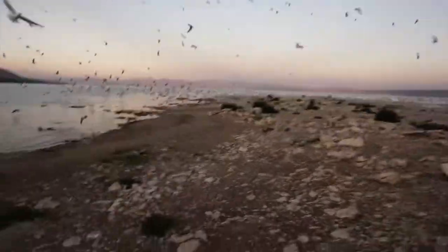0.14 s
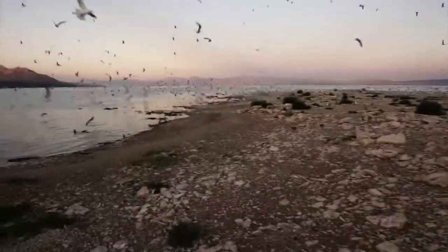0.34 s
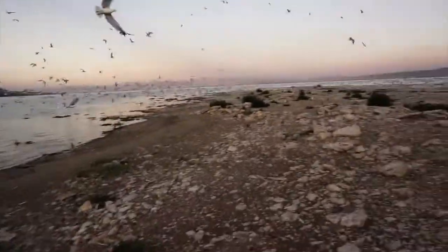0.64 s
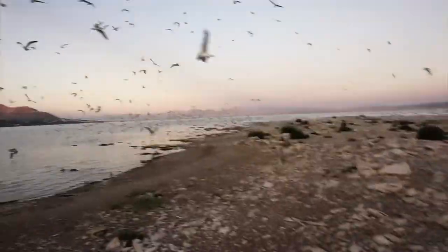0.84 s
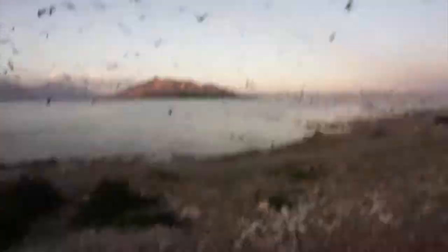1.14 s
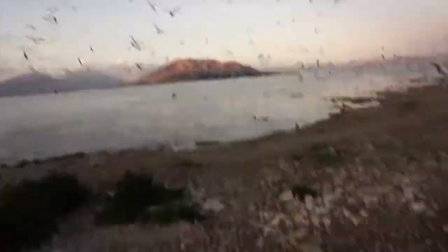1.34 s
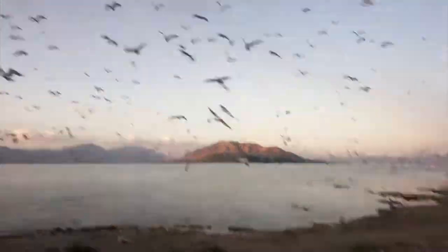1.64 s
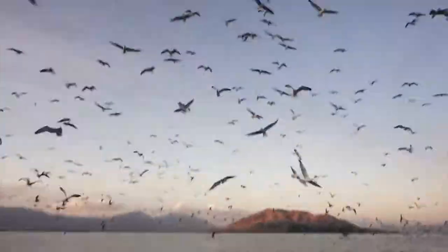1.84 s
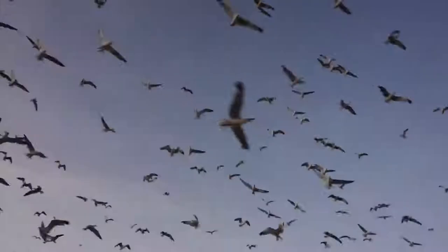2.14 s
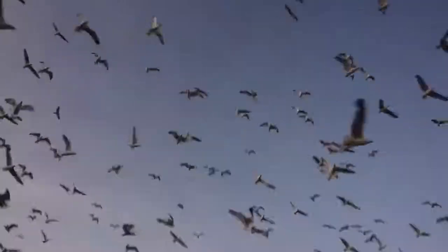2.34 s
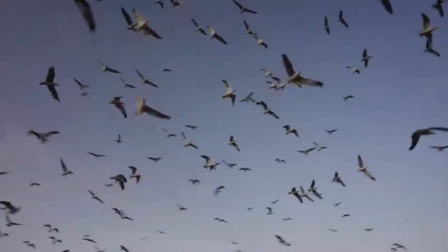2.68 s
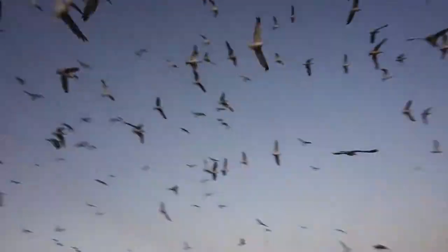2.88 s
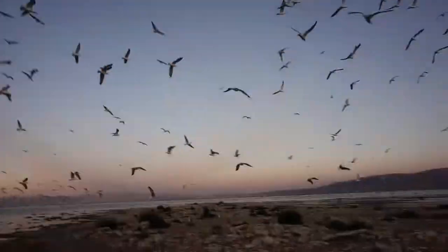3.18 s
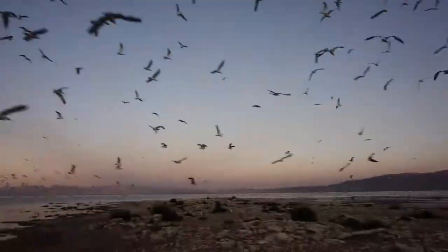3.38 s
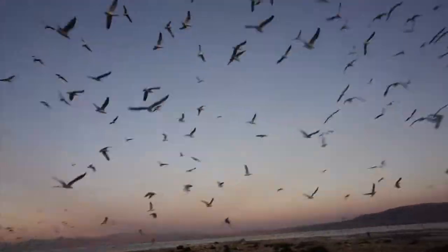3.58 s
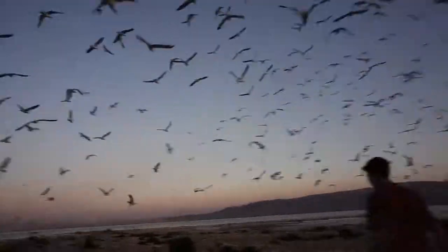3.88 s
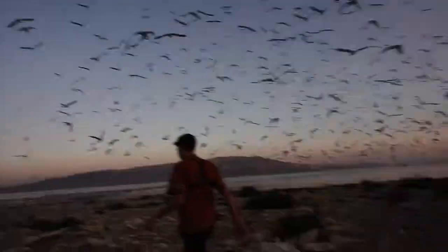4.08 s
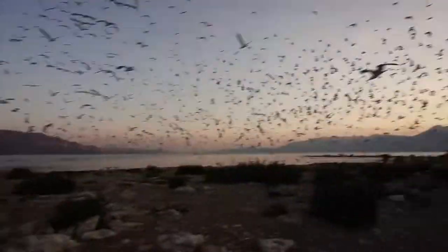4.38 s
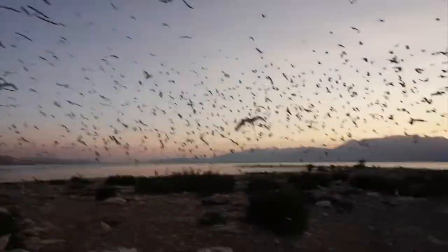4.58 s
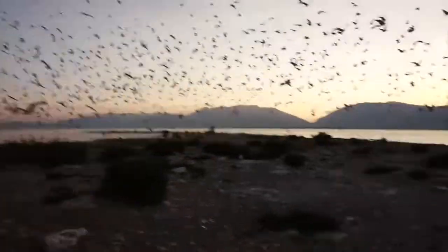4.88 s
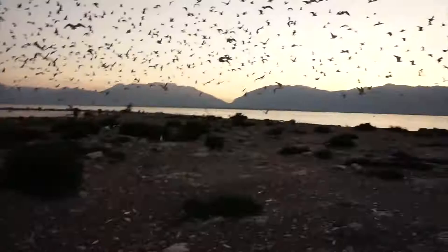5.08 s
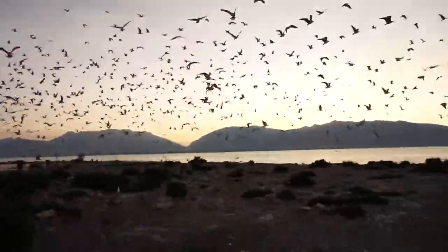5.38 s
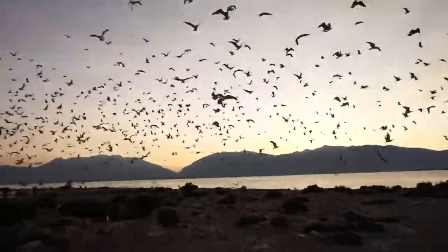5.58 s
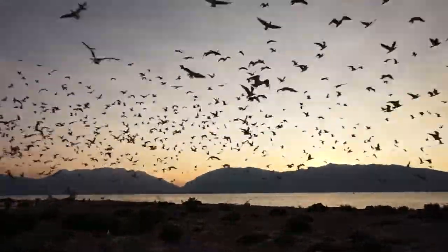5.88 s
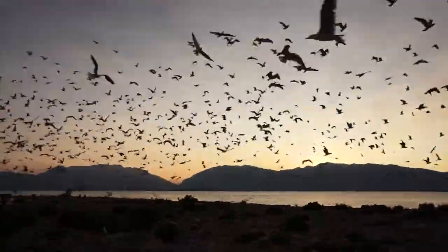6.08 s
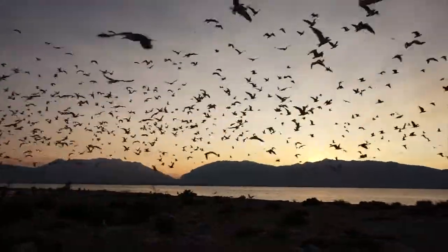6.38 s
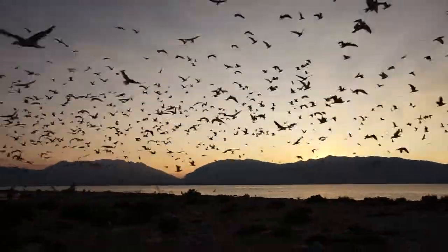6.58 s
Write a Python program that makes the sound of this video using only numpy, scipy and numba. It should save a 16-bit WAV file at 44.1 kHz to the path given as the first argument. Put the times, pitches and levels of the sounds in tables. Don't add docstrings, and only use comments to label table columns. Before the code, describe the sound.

Outdoors by water, a swirling gull colony screams without pause, starting moderately quiet and farther off, closing in to a thick wall of piercing cries. Single arched calls, high whistles and hoarse rasps stand out nearby, leaning slightly left. Wind puffs begin just before two seconds and grow into heavy, fluttering buffets around four to five, then weaken. Handheld stereo microphone, dry open air, limited top treble.

```python
import sys
import numpy as np
from scipy import signal
from scipy.io import wavfile
from scipy.ndimage import uniform_filter1d
from numba import njit

SR = 44100
rng = np.random.default_rng(int(sys.argv[2]) if len(sys.argv) > 2 else 0)


def amplitude_ratio(level_db):
    exponent = np.asarray(level_db, float) / 20
    return 10 ** exponent


def inscribe(sig):
    pcm = np.round(np.clip(np.atleast_2d(sig).T, -1, 1) * 32767)
    wavfile.write(sys.argv[1], SR, pcm.astype(np.int16))


N = 296793

# time in seconds, level in dB.
BREEZE = [
    (0, -80),
    (.43, -86),
    (1.3, -76),
    (2.3, -63),
    (2.8, -57),
    (3.6, -63),
    (5.3, -48),
    (6.73, -66),
]
# peak in seconds, level in dB, seconds to rise 20 dB, seconds to fall 20 dB.
GUSTS = [(.65, -71, .3, 1.5), (1.65, -57, .4, .22), (1.8, -43, .055, .4), (2.15, -48, .09, .11),
         (2.88, -39, .11, .19), (3.75, -43, .085, .18), (3.86, -36, .055, .09), (4.01, -32, .06, .21),
         (4.35, -33, .5, .11), (4.57, -26, .042, .07), (4.74, -25, .19, .42), (5.73, -39, .8, .24),
         (6.02, -36.5, .7, .27), (6.37, -36, .035, .13), (6.69, -47, .14, .06)]
# centre in seconds, level in dB, half-length in seconds.
EDDIES = [(1.82, -46, 0.024), (2.844, -25, 0.017), (2.906, -27.5, 0.023), (2.95, -33, 0.031),
          (3.751, -40, .012), (3.868, -27.5, 0.014), (3.885, -37, 0.011), (4.009, -17.5, 0.011),
          (4.083, -27, .014), (4.151, -39, 0.026), (4.301, -44, .03), (4.36, -36, 0.033), (4.571, -41, .03),
          (4.685, -33, 0.023), (4.75, -18, 0.037), (4.832, -22.5, .04), (4.886, -23, 0.026),
          (4.945, -22, 0.0059), (5.002, -26, 0.0098), (5.734, -36, 0.02), (5.955, -37.5, 0.037),
          (6.027, -35, 0.013), (6.382, -44, 0.025)]
# frequency in Hz, level in dB per Hz.
BUFFET_COLOUR = [(20, -17.5), (50, 1.5), (105, -2.5), (170, -6), (260, -16), (500, -62)]
# frequency in Hz, level in dB per Hz.
FLUTTER_COLOUR = [(60, -30), (130, 1), (220, -2.5), (330, -7.5), (480, -10), (800, -47.5)]
# frequency in Hz, likeness from -1 to 1.
WIND_LIKENESS = [(30, 0.86), (70, 0.99), (130, 0.44), (260, -0.16), (500, -0.76)]
# level in dB, resonance in Hz, width in Hz.
HAND_TAP = (-43.5, 620, 503)
TAP_S = 1.04

# time in seconds, level in dB.
FLOCK_LEVEL = [(0, -29.5), (.34, -30), (.71, -27.7), (1.3, -28.2), (1.76, -26.5), (1.9, -24.5),
               (2.4, -24.8), (2.68, -24.5), (2.81, -21.3), (3.04, -23), (3.47, -23), (3.6, -20),
               (4.12, -20.2), (4.7, -17.5), (4.76, -20.5), (4.87, -17.5), (6.13, -17.2), (6.73, -17.2)]
# centre in seconds, boost in dB, half-length in seconds.
SURGES = [
    (1.81, 2.3, .03),
    (2.2, 1.6, .14),
    (3.11, 3.5, .035),
    (3.32, 3.3, .09),
]
# frequency in Hz, level in dB per Hz.
DIN_COLOUR = [(150, -60), (250, -33.5), (408, -17.5), (550, -18.5), (828, -14.5), (1020, -14), (1440, -4),
              (2240, -1.5), (2460, -3), (2660, -3), (3020, -4), (4920, -12), (6040, -23), (9390, -34),
              (10800, -37), (14100, -69), (22000, -120)]
# frequency in Hz, likeness from -1 to 1.
DIN_LIKENESS = [(300, 0.99), (1100, 0.67), (2400, 1), (5000, 0.41), (10000, 0.25)]
LEAD_S = -0.000053
# time in seconds, left over right in dB, treble in dB.
AIM = [
    (0, 1.5, 1),
    (.6, 1.4, -1),
    (1.5, 1.2, 3),
    (2.27, 1, -.8),
    (3.4, -1, -4.5),
    (4.7, 1.2, -2),
    (5.38, 3, 0),
    (6.1, 2, 1.5),
    (6.73, 1, 0.5),
]

# start in seconds, length in seconds, level in dB, pulses per second.
RASPS = [(0.553, 0.031, -45.5, 160), (0.742, 0.046, -45, 340), (1.076, .1, -40.5, 300),
         (1.405, 0.056, -41.5, 300), (1.99, 0.093, -41, 300), (2.362, 0.05, -48, 300),
         (3.069, 0.061, -48.5, 250), (3.323, 0.067, -43.5, 300), (4.674, .05, -37.5, 100),
         (5.717, .08, -27, 260), (6.43, .06, -40.5, 140), (6.577, .06, -30, 490)]
# frequency in Hz, width in Hz, level in dB.
RASP_THROAT = [(3300, 560, 15.5), (6500, 2000, -12.5), (9200, 2500, -29)]
# start in seconds, length in seconds, top pitch in Hz, level in dB.
ARCHES = [
    (.755, .08, 1530, -32.5),
    (1.212, .11, 1855, -32),
    (1.53, .11, 1775, -36),
    (1.63, .155, 2865, -31),
    (1.995, .075, 2800, -29),
    (2.31, .055, 1675, -27),
]
# start in seconds, length in seconds, first and last pitch in Hz, level in dB.
WHISTLES = [
    (.733, .064, 2775, 2760, -40),
    (1.41, .04, 2880, 2800, -42),
    (2.19, .3, 2580, 2735, -30),
    (2.77, .14, 2675, 2735, -31),
    (3.39, .12, 2885, 2875, -34),
    (4.98, .04, 2930, 2830, -35),
    (5.952, .064, 2715, 2670, -28),
]
# start in seconds, length in seconds, first and last pitch in Hz, level in dB.
CAWS = [(.225, .08, 1845, 1795, -43), (.153, .058, 2740, 2700, -38), (.547, .055, 1398, 1393, -42),
        (1.064, .058, 1744, 1705, -40), (1.496, .064, 1403, 1374, -36), (1.7, .069, 1613, 1615, -36),
        (1.984, .058, 1570, 1552, -32), (2.115, .055, 1440, 1444, -35), (2.512, .238, 2915, 2945, -31),
        (4.114, .09, 2666, 2610, -33), (3.07, .06, 1815, 1780, -32), (2.73, .081, 2001, 2020, -33),
        (2.82, .06, 1805, 1760, -29), (2.945, .084, 1415, 1400, -39), (3.35, .05, 1800, 1720, -28),
        (3.95, .09, 1957, 1928, -32), (4.248, .064, 1528, 1558, -30), (4.321, .055, 1367, 1355, -30),
        (4.663, .069, 1352, 1334, -30), (4.672, .064, 1555, 1545, -30), (5.171, .055, 1561, 1548, -33),
        (5.22, .2, 1570, 1550, -33), (5.798, .058, 1506, 1509, -31), (6.02, .1, 1545, 1535, -26)]
# start in seconds, length in seconds, first and last pitch in Hz, level in dB.
SCREAMS = [
    (0, .07, 1860, 1745, -45),
    (.265, .07, 1443, 1413, -44),
    (2.21, .16, 1560, 1418, -34.5),
    (2.575, .05, 1610, 1550, -37),
    (3.005, .1, 1395, 1350, -41),
    (5.41, .055, 1568, 1530, -35),
    (5.74, .06, 1545, 1575, -34),
]
# frequency in Hz, level in dB.
BILL = [(1400, -3), (2900, 0), (3700, 0), (4500, -6), (5600, -19), (7200, -27), (11000, -36)]
ARCH_RISE, ARCH_FALL = .035, .022
SETTLE = .77
SCREAM_TILT_DB, SCREAM_HALF = 3.5, .2
SCREAM_JITTER, CLEAN_JITTER = .007, .005
WHISTLE_LEFT_DB, CAW_LEFT_DB = 7, 3
UPPER_HZ, OCTAVE_DB = 2400, 8.5

# frequency in Hz, share of weak cells lost in percent.
GAPS = [(7000, 0), (8500, 2), (9500, 8), (10700, 26)]
EDGE_HZ = 10980


def evened(x):
    return x / np.sqrt(np.mean(x ** 2) + 1e-20)


def read(points, hz):
    f, value = np.transpose(points)
    return np.interp(np.log(hz + 1), np.log(f + 1), value)


def curve(rows, t):
    s, *columns = np.transpose(rows)
    return [np.interp(t, s, c) for c in columns]


def add(mix, s, sound):
    part = mix[:, round(s * SR):][:, :sound.shape[1]]
    part += sound[:, :part.shape[1]]


def resonate(x, hz, width):
    r = np.exp(-np.pi * width / SR)
    return signal.lfilter([1 - r, 0, r - 1], [1, -2 * r * np.cos(2 * np.pi * hz / SR), r * r], x)


def pair_noise(size, same, lead):
    hz = np.fft.rfftfreq(size, 1 / SR)
    t = np.arange(4 * N // size + 5) * size / 4 / SR
    a, b, c, d = rng.standard_normal((len(t), len(hz), 4)).T
    like = np.clip(read(same, hz), -1, 1)[:, None]
    left = a + 1j * b
    delay = np.exp(-2j * np.pi * hz * lead)[:, None]
    right = like * left * delay + np.sqrt(1 - like ** 2) * (c + 1j * d)
    return hz, t, np.array([left, right])


def wind():
    t = np.arange(N) / SR
    flutter = np.sqrt(sum(amplitude_ratio(2 * db) * np.exp(-((t - s) / half) ** 2 * 2) for s, db, half in EDDIES))
    gusts = 0
    for s, db, rise, fall in GUSTS:
        gusts = gusts + amplitude_ratio(2 * db - 2 * 20 * np.maximum((s - t) / rise, (t - s) / fall))
    buffet = amplitude_ratio(1.5) * np.sqrt(amplitude_ratio(2 * curve(BREEZE, t)[0]) + gusts)
    out = 0
    for colour, level, width, depth_db in [(BUFFET_COLOUR, buffet, 700, 3.0), (FLUTTER_COLOUR, flutter, 250, 3.5)]:
        hz, _, z = pair_noise(2048, WIND_LIKENESS, 0)
        z = z * amplitude_ratio(read(colour, hz))[:, None]
        noise = signal.istft(z, nperseg=2048, noverlap=1536)[1][:, :N]
        lumps = uniform_filter1d(uniform_filter1d(rng.standard_normal(N), width), width)
        out = out + level * evened(noise * amplitude_ratio(depth_db * evened(lumps)))
    return out


def tap():
    db, hz, width = HAND_TAP
    mix = np.zeros((2, N))
    scuff = resonate(rng.standard_normal(1500) * np.hanning(1500), hz, width)
    add(mix, TAP_S - .015, amplitude_ratio(db) * evened(scuff) * np.ones((2, 1)))
    return mix


@njit
def add_cries(mix, rows, gains, wobble, rate):
    for n in range(len(rows)):
        s, length, a, m, b, left, lead, jitter, droop, half = rows[n]
        count, turn = int(length * rate), 0.
        for i in range(count + 900):
            at = int(s * rate) + i
            if at < 0 or at >= mix.shape[1]:
                continue
            u = min(2. * i / count - 1, 1.)
            over = max(i - count, 0) / 900
            hz = (m + u * (b - a) / 2 + u * u * ((a + b) / 2 - m)) * (1 - droop * over)
            turn += 2 * np.pi * hz * (1 + jitter * wobble[(at + 7919 * n) % len(wobble)]) / rate
            level = min(i / 600, 1.) * (1 - over) * (1 + half * np.cos(turn / 2))
            for side in range(2):
                c = np.cos(turn - side * 2 * np.pi * hz * lead)
                now, before, total = c, 1., 0.
                for k in range(gains.shape[1]):
                    total += gains[n, k] * now
                    now, before = 2 * c * now - before, now
                mix[side, at] += level * total * (left if side == 0 else 1 / left)


def cries(rows, gains):
    mix = np.zeros((2, N))
    wobble = evened(uniform_filter1d(rng.standard_normal(N), 60))
    add_cries(mix, rows, gains, wobble, SR)
    return mix


def crowd(count=2600):
    u, g = rng.random((count, 8)).T, rng.standard_normal((count, 12)).T
    hz = 1600 * np.exp(.13 * g[0]) * np.where(u[1] < .25, 1.7, 1)
    near_db = 1.7 * np.minimum(-np.log(u[2]), 3)
    k = np.arange(1, 8)[:, None]
    partial_db = near_db - 5 * k * hz / 1500 + 3.5 * np.clip(g[5:], -2, 2)
    gains = amplitude_ratio(partial_db) * (k * hz < 11000)
    gains *= np.sign(rng.standard_normal((count, 7)).T)
    start_s = (np.arange(count) + u[0]) * 7 / count - .2
    length = .02 + .09 * u[3] ** 2
    start, end = hz * (.99 + .015 * g[1]), hz * (.985 + .015 * g[2])
    jitter, droop, half = .008 + .05 * u[4] ** 3, .08 * u[5], .8 * u[6] ** 3
    left, lead = amplitude_ratio(1.5 * g[3]), LEAD_S + 8e-5 * g[4]
    rows = [start_s, length, start, hz, end, left, lead, jitter, droop, half]
    return cries(np.transpose(rows).copy(), gains.T.copy())


def flock():
    hz, t, far = pair_noise(1024, DIN_LIKENESS, LEAD_S)
    near = signal.stft(crowd(), nperseg=1024, noverlap=768)[2]
    t, far = t[:near.shape[2]], far[..., :near.shape[2]]
    near /= np.sqrt(uniform_filter1d((abs(near) ** 2).mean((0, 2)), 7))[:, None]
    clumps = uniform_filter1d((abs(near) ** 2).mean(0), size=30, axis=1)
    clumps = uniform_filter1d(clumps, size=5, axis=0)
    near /= clumps ** .34
    voiced = np.clip((hz - 1120) / 150, 0, 1)[:, None]
    near *= voiced
    patches = uniform_filter1d(rng.standard_normal(far.shape[::-1][:2]).T, 10, 0)
    patches = evened(uniform_filter1d(patches, 14, 1))
    far *= amplitude_ratio(.8 * patches - 3 * voiced)
    z = (near + far) * amplitude_ratio(read(DIN_COLOUR, hz))[:, None]
    treble_db = curve(AIM, t)[1]
    shelf = np.clip(np.log2(hz / 3500 + 1e-9), 0, 1)[:, None]
    z *= amplitude_ratio(shelf * (treble_db - treble_db.mean()))
    din = evened(signal.istft(z, nperseg=1024, noverlap=768)[1][:, :N])
    t = np.arange(N) / SR
    side_db = curve(AIM, t)[0]
    surge_db = sum(db * np.exp(-((t - s) / half) ** 2) for s, db, half in SURGES)
    return din * amplitude_ratio(curve(FLOCK_LEVEL, t)[0] + surge_db + 1.76 + np.array([side_db, -side_db]) / 2)


def rasps():
    mix = np.zeros((2, N))
    for s, length, db, per_s in RASPS:
        t = np.arange(0, length, 1 / SR)
        puffs = np.exp(-(per_s * t % 1) / .3) * rng.standard_normal((2, len(t)))
        puffs = puffs + .8 * puffs[::-1]
        throat = sum(amplitude_ratio(g) * resonate(puffs, f, w) for f, w, g in RASP_THROAT)
        add(mix, s, amplitude_ratio(db) * evened(throat) * signal.windows.tukey(len(t), .5))
    return mix


def near_gulls():
    arched = [(s, n, f * (1 - ARCH_RISE), f, f * (1 - ARCH_FALL), db) for s, n, f, db in ARCHES]
    level = [(s, n, a, (a + b) / 2, b, db) for s, n, a, b, db in list(WHISTLES) + list(CAWS)]
    harsh = [(s, n, a, a + SETTLE * (b - a), b, db) for s, n, a, b, db in SCREAMS]
    rows = np.array(arched + level + harsh)
    k = np.arange(1, 8)
    place = np.arange(len(rows))
    scream = place >= len(arched + level)
    whistle = (place < len(ARCHES) + len(WHISTLES)) & (rows[:, 3] > UPPER_HZ)
    hz = rows[:, 2:5].max(1)[:, None] * k
    voice_db = read(BILL, hz) + SCREAM_TILT_DB * np.outer(scream, np.minimum(k, 4) - 1)
    voice_db = voice_db + OCTAVE_DB * np.outer(whistle, k == 2)
    gains = np.sqrt(2) * amplitude_ratio(rows[:, 5:] + voice_db) * (hz < 11000)
    pan_db = np.where(scream | whistle, WHISTLE_LEFT_DB, CAW_LEFT_DB)
    lead = LEAD_S + 8e-6 * pan_db
    jitter = np.where(scream, SCREAM_JITTER, CLEAN_JITTER)
    droop = np.full(len(rows), .05)
    voices = np.c_[rows[:, :5], amplitude_ratio(pan_db / 2), lead, jitter, droop, SCREAM_HALF * scream]
    return cries(voices, gains)


def scene():
    return wind() + tap() + flock() + rasps() + near_gulls()


def thin_treble(x):
    hz, _, z = signal.stft(x, SR, nperseg=1024, noverlap=768)
    power = uniform_filter1d((abs(z) ** 2).mean(0), size=6, axis=0)
    power = uniform_filter1d(power, size=4, axis=1)
    log_power = np.log(power + 1e-20)
    weak = log_power - uniform_filter1d(log_power, size=24, axis=1)
    rank = 100 * weak.argsort(1).argsort(1) / weak.shape[1]
    kept = z * (rank >= read(GAPS, hz)[:, None])
    return signal.istft(kept, nperseg=1024, noverlap=768)[1][:, :N]


def roll_off(x):
    return signal.sosfilt(signal.butter(12, 10970, fs=SR, output="sos"), x)


def record(dry):
    low = signal.lfilter(*signal.butter(2, 500, fs=SR), dry)
    low_db = 10 * np.log10(uniform_filter1d((low ** 2).mean(0), 500) + 1e-12)
    over_db = np.maximum(low_db + 24, 0)
    limited = .85 * np.tanh(dry / amplitude_ratio(.3 * over_db) / .85)
    edge = signal.firwin(801, EDGE_HZ, window=("kaiser", 9), fs=SR)[None]
    mix = signal.oaconvolve(thin_treble(limited), edge, "same")
    return roll_off(mix)


dry = scene()
out = record(dry)
inscribe(out)
```